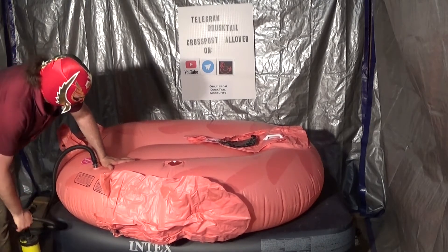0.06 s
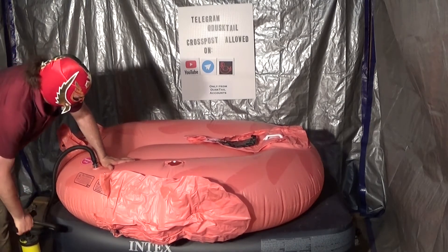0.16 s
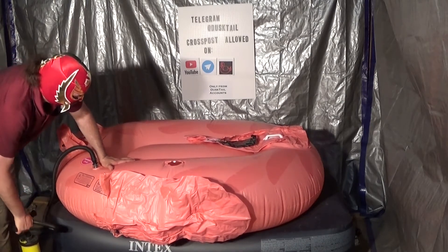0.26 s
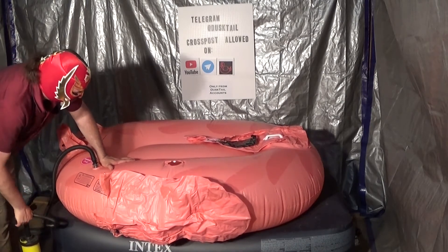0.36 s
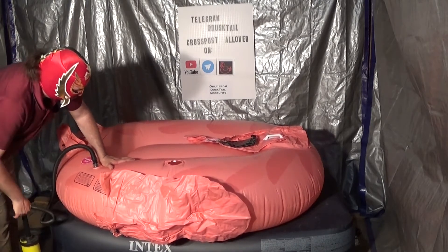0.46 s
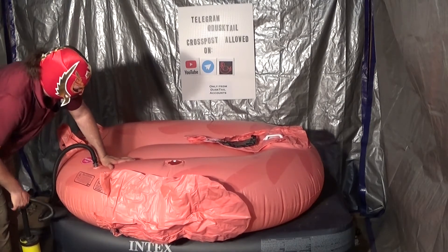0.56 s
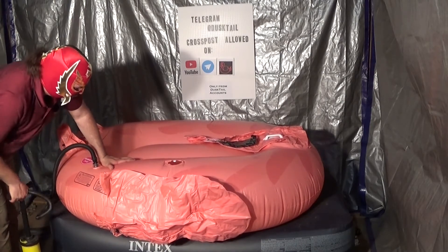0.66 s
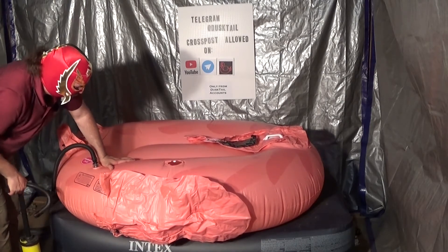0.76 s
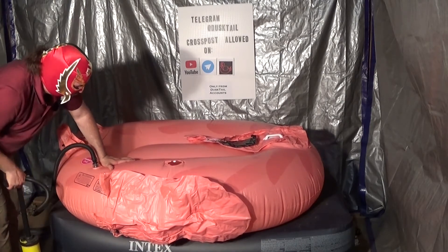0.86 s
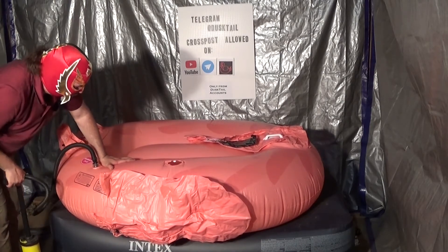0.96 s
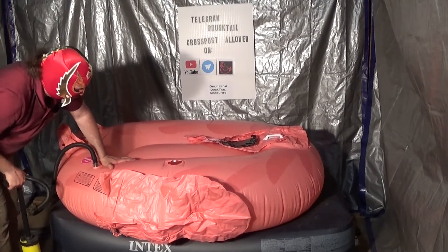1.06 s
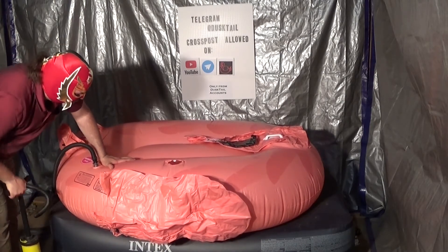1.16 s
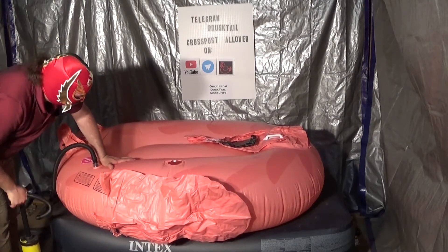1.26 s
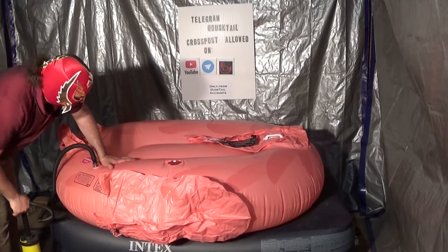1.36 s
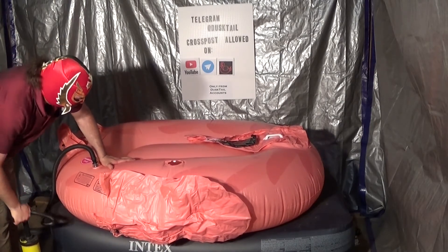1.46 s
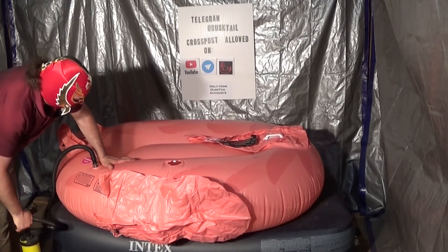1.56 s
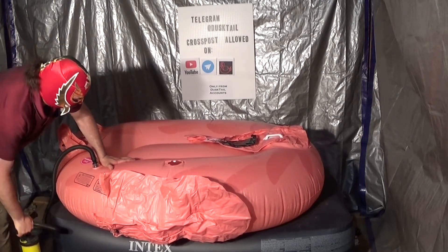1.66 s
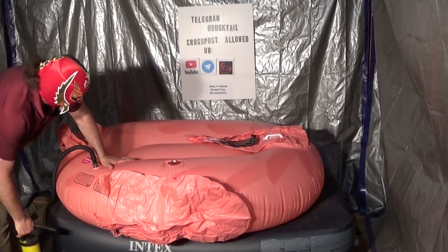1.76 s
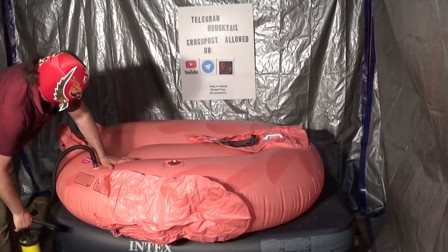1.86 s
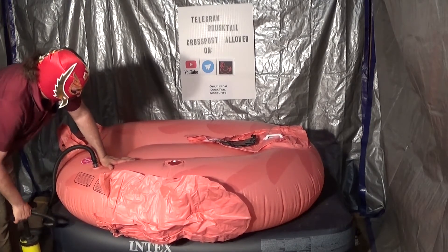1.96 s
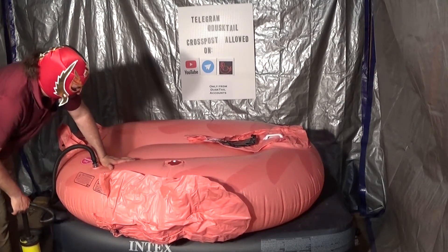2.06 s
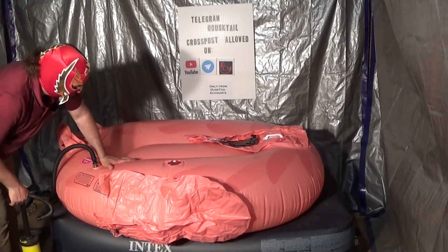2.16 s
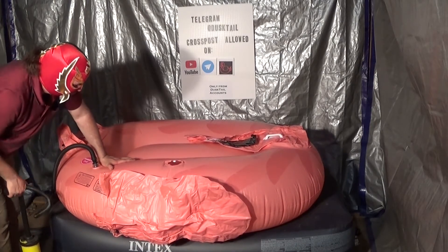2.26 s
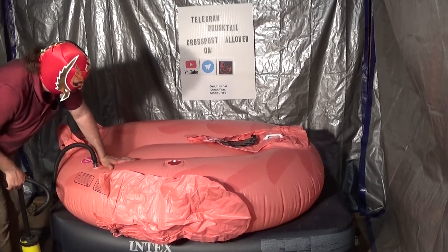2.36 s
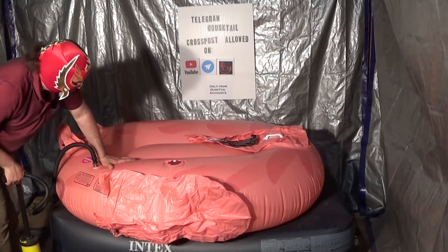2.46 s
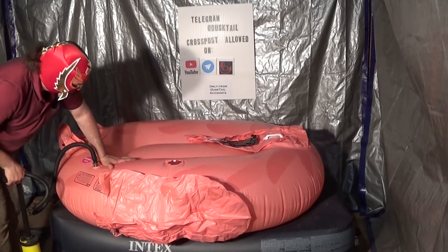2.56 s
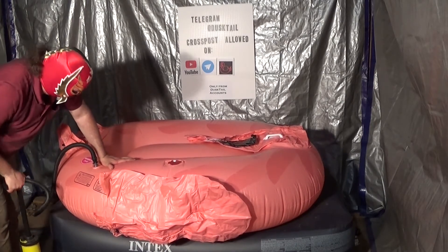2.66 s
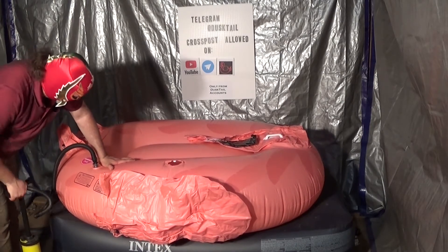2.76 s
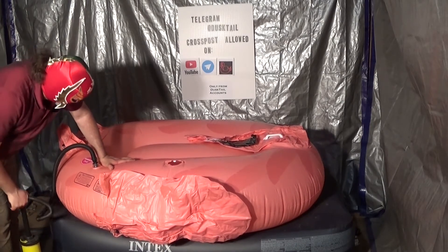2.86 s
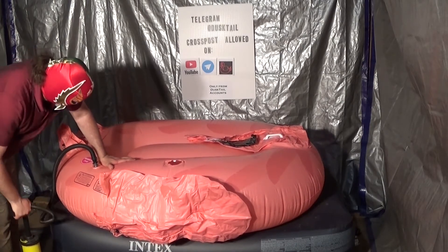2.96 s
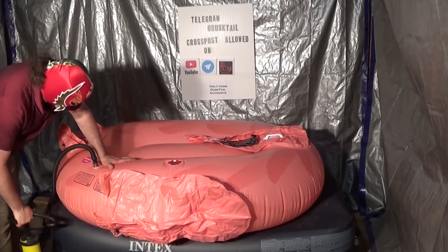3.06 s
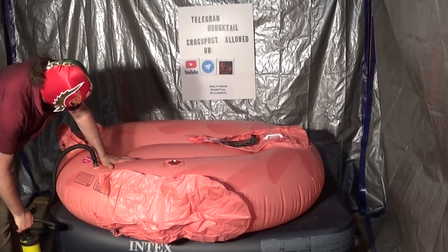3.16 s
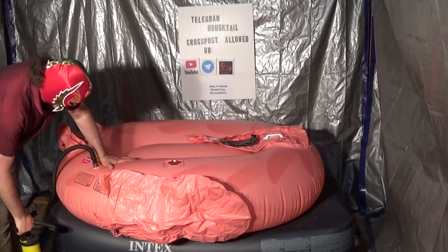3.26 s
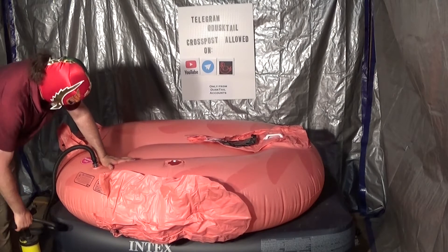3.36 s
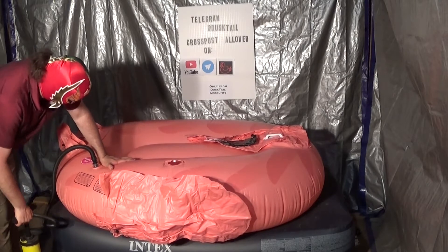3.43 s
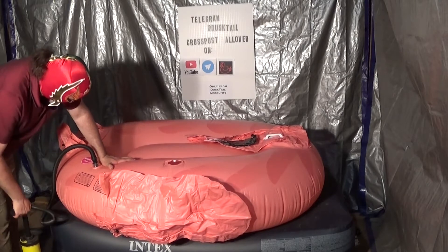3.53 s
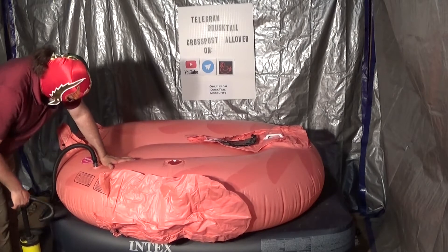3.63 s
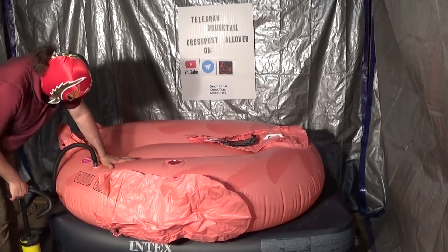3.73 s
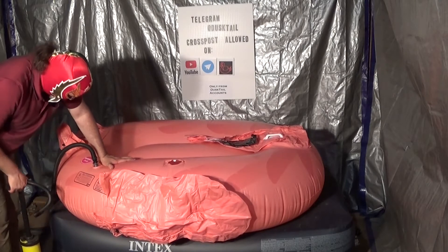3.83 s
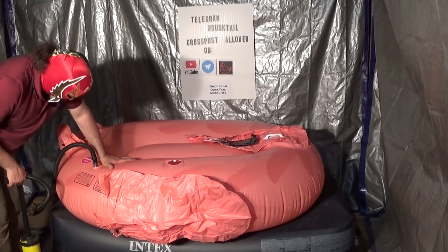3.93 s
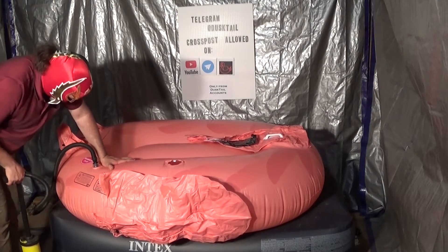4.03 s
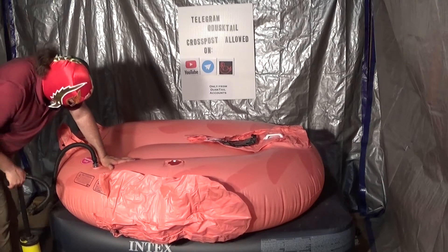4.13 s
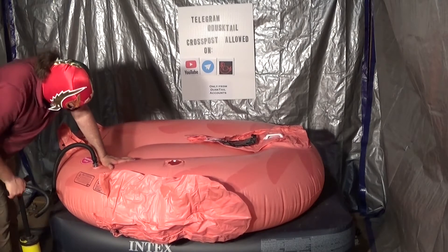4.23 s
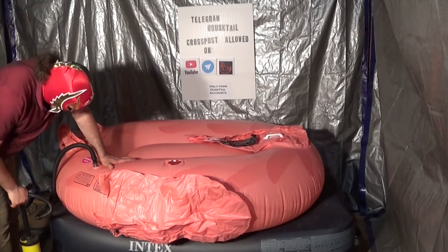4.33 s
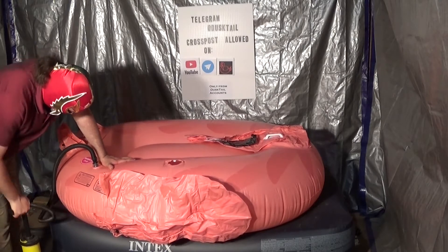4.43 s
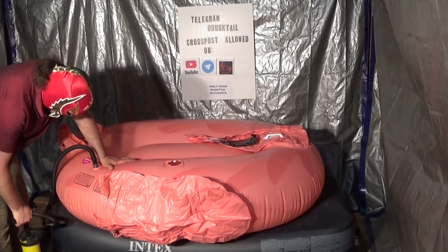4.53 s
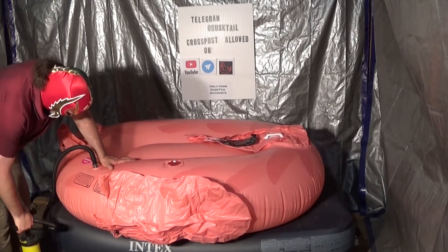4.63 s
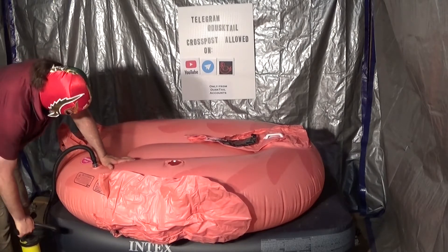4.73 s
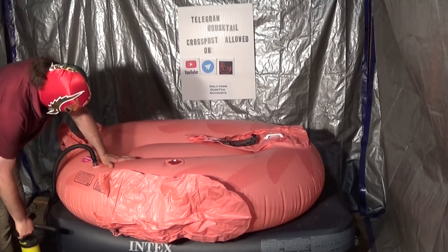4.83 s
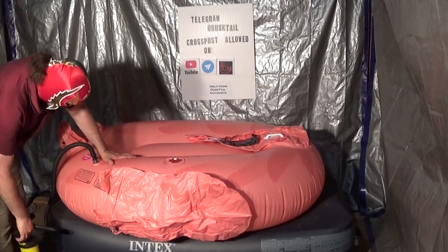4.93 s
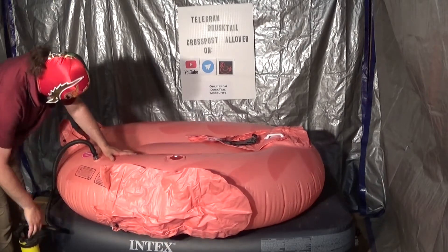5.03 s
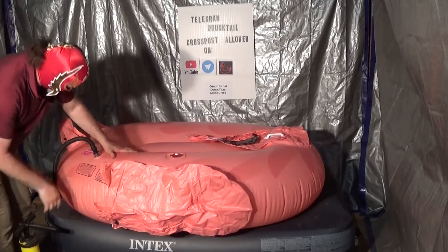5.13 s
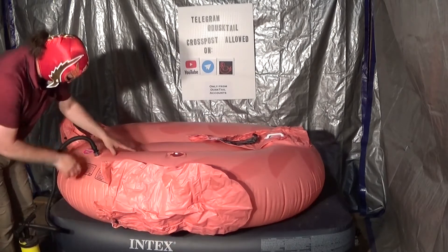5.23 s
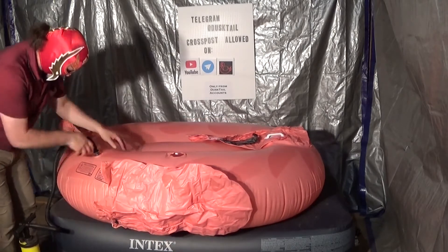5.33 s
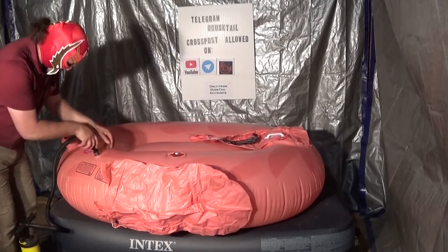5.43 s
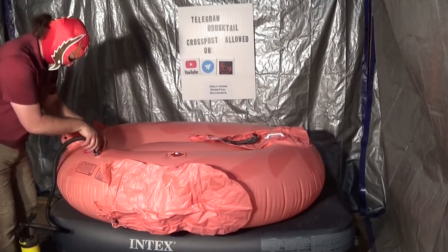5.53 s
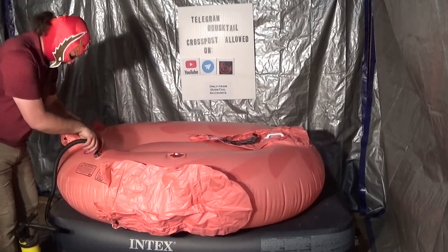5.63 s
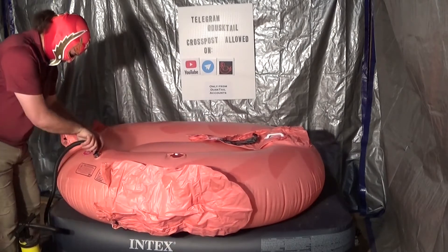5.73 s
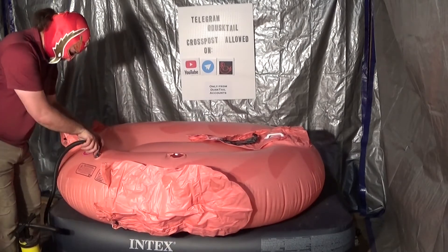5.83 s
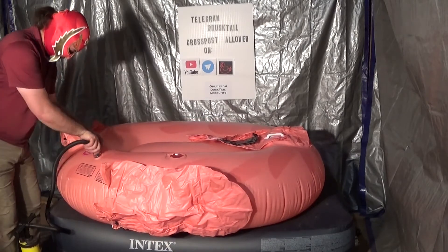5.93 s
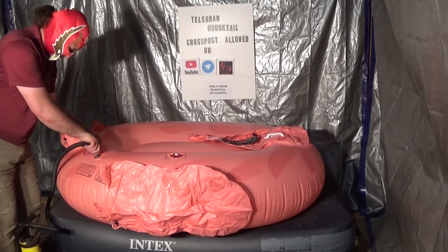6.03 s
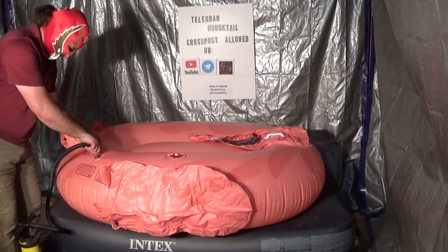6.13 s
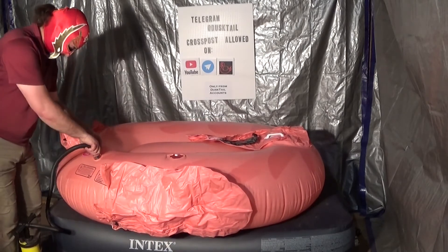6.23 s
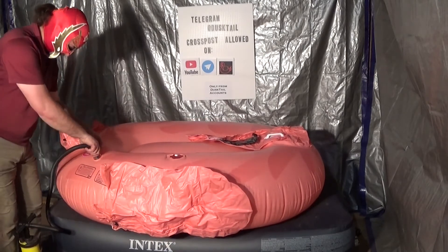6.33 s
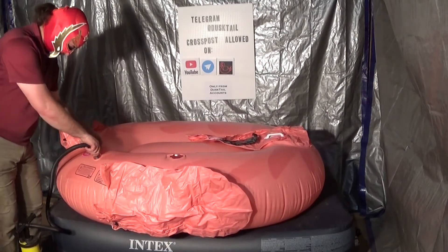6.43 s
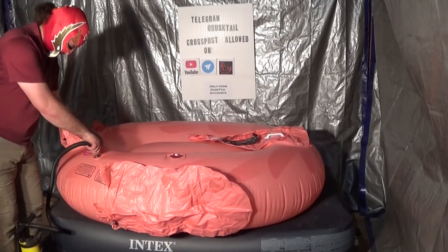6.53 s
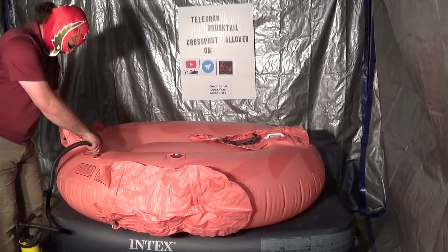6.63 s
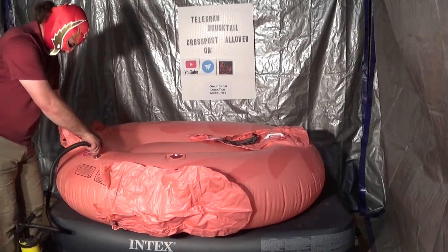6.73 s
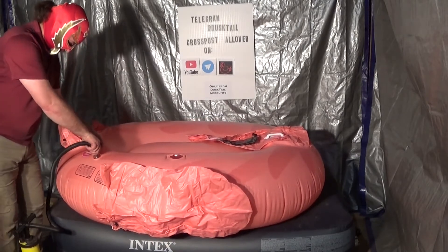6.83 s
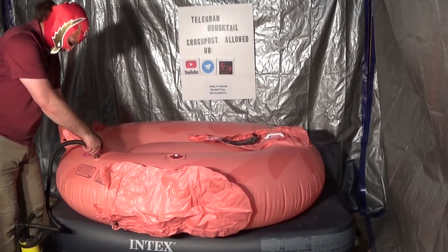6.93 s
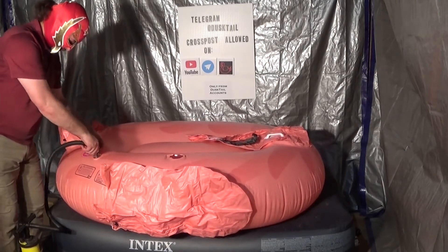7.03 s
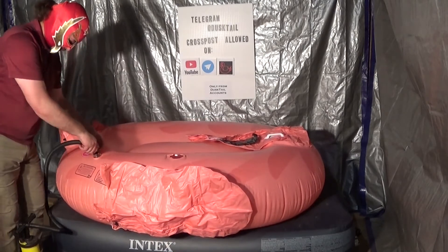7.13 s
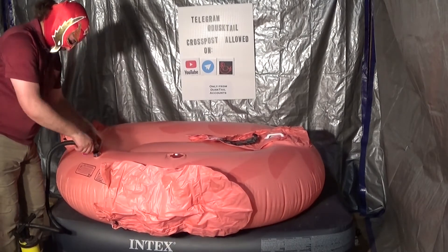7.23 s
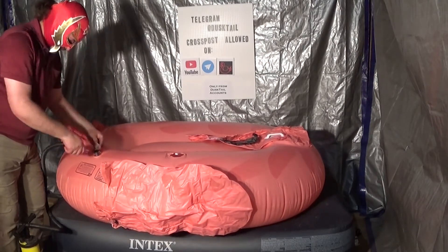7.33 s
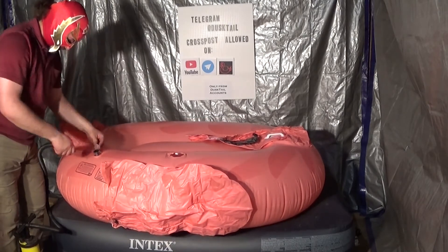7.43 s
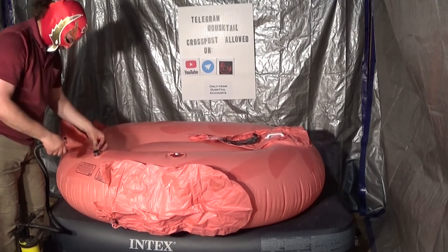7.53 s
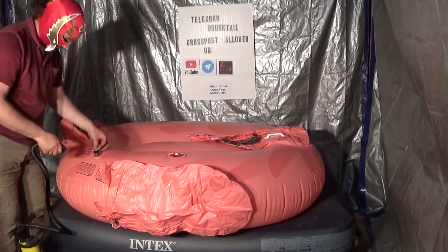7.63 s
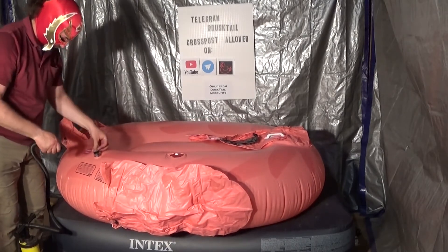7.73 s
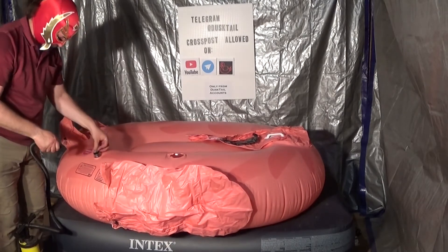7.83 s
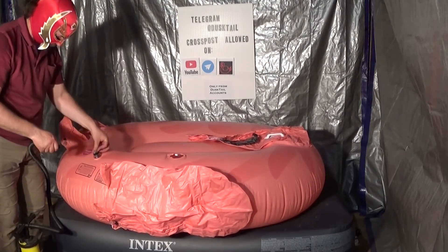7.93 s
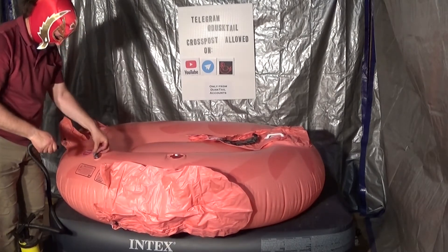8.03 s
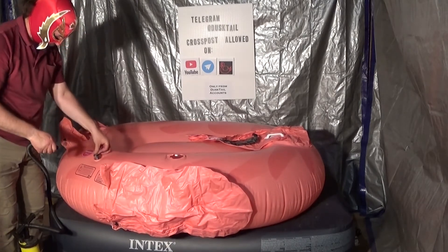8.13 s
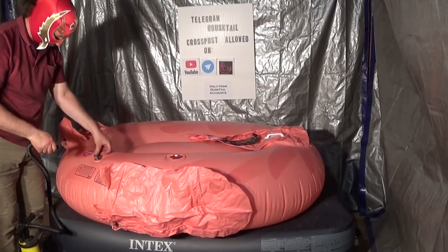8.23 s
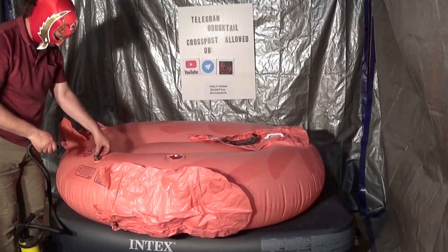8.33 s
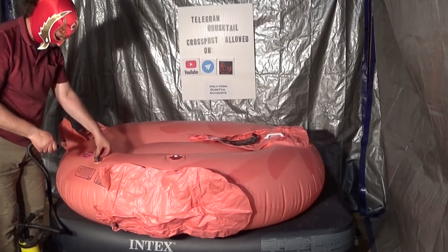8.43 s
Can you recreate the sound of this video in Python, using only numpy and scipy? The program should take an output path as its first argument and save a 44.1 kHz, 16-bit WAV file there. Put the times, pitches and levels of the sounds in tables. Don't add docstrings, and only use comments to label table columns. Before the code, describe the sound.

In a small padded room, a double-action hand pump pushes air through a ribbed hose, each stroke a bright hissing rush with a low thump at the turn. After several strokes it stops, the handle drops softly, and hands knock, rub and click at the vinyl and nozzle. A quiet fan hums. Close stereo pickup, short room reflections.

```python
import sys
import numpy as np
from scipy import signal
from scipy.fft import rfft, irfft
from scipy.io import wavfile
from scipy.ndimage import uniform_filter1d, map_coordinates

SR = 44100
rng = np.random.default_rng(int(sys.argv[2]) if len(sys.argv) > 2 else 0)


def output_pcm(signal):
    pcm = np.clip(np.atleast_2d(signal).T, -1, 1) * 32767
    wavfile.write(sys.argv[1], SR, np.round(pcm).astype(np.int16))


def gain_from_decibels(decibels):
    exponent = np.asarray(decibels, float) / 20
    return 10 ** exponent


N = 373968
CONTROL_STEP = 32

# valve_opens_s, jet_db, hand_slows_s, piston_rests_s, down (1 = push, 0 = pull)
STROKES = [
    (-0.41, -21.8, 0.0, 0.3, 1),
    (0.309, -18, 0.8, 1.03, 0),
    (1.127, -19.2, 1.54, 1.835, 1),
    (1.844, -18.6, 2.39, 2.61, 0),
    (2.678, -19, 3.05, 3.38, 1),
    (3.376, -18.2, 3.88, 4.11, 0),
    (4.183, -18.6, 4.57, 4.87, 1),
]


def unit(x):
    return x / np.sqrt(np.mean(x ** 2) + 1e-20)


def along(points, hz):
    point_hz, value = np.transpose(points)
    return np.interp(np.log(hz + 1), np.log(point_hz + 1), value)


def clock():
    return np.arange(0, N + CONTROL_STEP, CONTROL_STEP) / SR


def smooth(control):
    return np.interp(np.arange(N) / CONTROL_STEP, np.arange(len(control)), control)


def wobble(rate_hz):
    knots = rng.standard_normal(int(N * rate_hz / SR) + 4)
    return smooth(map_coordinates(knots, [clock() * rate_hz]))


def filtered(x, response):
    size = 2 ** 16 * (N // 2 ** 16 + 1)
    return irfft(rfft(x, size) * response(np.fft.rfftfreq(size, 1 / SR)), size)[..., :N]


def modes(table, f):
    total = 0
    for k, (hz, width_hz, db) in enumerate(table):
        total = total + (-1) ** k * gain_from_decibels(db) * 1j * f * width_hz / (hz * hz - f * f + 1j * f * width_hz)
    return total


def rush(colour, patchy_db):
    re, im, field = rng.standard_normal((3, 257, N // 256 + 3))
    field = uniform_filter1d(uniform_filter1d(field, size=5, axis=0), size=8, axis=1)
    patchy = (re + 1j * im) * gain_from_decibels(patchy_db * unit(field))
    noise = signal.istft(patchy, window="cosine", nperseg=512)[1][:N]
    return unit(filtered(noise, colour))


def ring(table):
    t = np.arange(SR // 2) / SR
    tones = 0
    for hz, db, t60_s in table:
        tones = tones + gain_from_decibels(db + rng.normal(0, 1) - 60 * t / t60_s) * np.sin(2 * np.pi * hz * t)
    return tones * (1 - np.exp(-t / 0.0051))


def bursts(rows, blow_db):
    out, t = np.zeros(N + SR), np.arange(SR // 2) / SR
    for start_s, db, t60_s in rows:
        rattle = rng.standard_normal(len(t)) * gain_from_decibels(db - 60 * t / np.clip(t60_s, .02, .5))
        rattle[0] = gain_from_decibels(db + blow_db)
        out[round(start_s * SR):][:len(t)] += rattle
    return out[:N]


def effort(over_db, attack_s, slows):
    slowing_db, slowing_bend, drain_db_per_s = 29, 1.9, 62
    t, power = clock(), 0
    for opens_s, db, slow_s, rest_s, down in STROKES:
        way = int(down > .5)
        slowed = np.clip((t - slow_s) / (rest_s - slow_s), 0, 1) ** slowing_bend
        loss_db = slowing_db * slowed * slows[way] + drain_db_per_s * np.clip(t - rest_s, 0, None)
        build = 1 - np.exp(-np.clip(t - opens_s, 0, None) / attack_s[way])
        power = power + (gain_from_decibels(db + over_db[way] - loss_db) * build) ** 2
    return smooth(power)


def turns(db, rise_s, fall_s):
    t, power = clock(), 0
    for opens_s, _, _, _, down in STROKES[1:]:
        way = int(down > .5)
        decay = np.where(t < opens_s, (t - opens_s) / rise_s[way], (opens_s - t) / fall_s)
        power = power + gain_from_decibels(2 * db[way]) * np.exp(decay * 2)
    return smooth(power)


def jolt(db):
    return turns(db, rise_s=(.025, .025), fall_s=.065)


def background():
    # hz, level_db [dB per Hz]
    room_tone = [(15, -95), (30, -85), (60, -85), (110, -88), (200, -90), (350, -90), (550, -90),
                 (900, -91), (1400, -94.5), (2200, -96.5), (3500, -100.5), (5500, -101.5), (8500, -105),
                 (12000, -110.5), (15700, -112)]
    # pitch_hz, width_hz, level_db
    fan_whines = [(58, 3, -62.5), (290, 20, -72), (511, 6, -67), (560, 7, -66), (689, 9, -72),
                  (821, 3, -63.5), (885, 12, -75), (1480, 9, -72), (1970, 8, -75)]

    def whine_response(f):
        total = 0
        for hz, width_hz, db in fan_whines:
            total = total + gain_from_decibels(db) * np.sqrt(2 * SR / (np.pi * width_hz)) * modes([(hz, width_hz, 0)], f) ** 2
        return total

    air, other = [gain_from_decibels(-55.5) * rush(lambda f: gain_from_decibels(along(room_tone, f)), patchy_db=1.2) for side in "ab"]
    return air + filtered(rng.standard_normal(N), whine_response), 2.0 * other


def camera():
    frame_rate_hz, first_tick_s = 30000 / 1001, .005
    t = np.arange(N) / SR
    since_frames = ((t - first_tick_s) * frame_rate_hz + .5) % 1 - .5
    pulse = np.exp(-(since_frames / frame_rate_hz / .004) ** 2)
    return gain_from_decibels(-60.5) * pulse * np.sin(2 * np.pi * 3820 * t)


def walls(x):
    # hz, t60_s
    decay_times = [(150, 0.52), (1000, 0.35), (5000, 0.28), (12000, 0.05)]
    step, out = 12288, np.zeros((2, N + SR))
    window = np.sin(np.pi * np.arange(2 * step) / (2 * step))
    padded = np.pad(x, (step, 2 * step))
    for at in range(-step, N, step):
        hz, t, z = signal.stft(rng.standard_normal((2, SR // 3)), SR, nperseg=256)
        tail = signal.istft(z * gain_from_decibels(-60 * t / along(decay_times, hz)[:, None]), SR, nperseg=256)[1]
        tail = tail / np.linalg.norm(tail[0])
        piece = padded[at + step:at + 3 * step] * window
        answer = signal.fftconvolve(piece[None], tail, axes=1)[:, max(-at, 0):]
        out[:, max(at, 0):][:, :answer.shape[1]] += answer
    return np.pad(out, ((0, 0), (200, 0)))[:, :N]


def knocks():
    # start_s, peak_db, thud_db, t60_s
    hand_knocks = [(5.121, -29.5, -16, 0.25), (5.189, -32.5, -18, 0.26), (5.242, -33, -14.5, 0.22),
                   (5.331, -22, -23, 0.2), (5.344, -28, -13, 0.18), (5.356, -28.5, -20.5, 0.19),
                   (5.508, -33, -15.5, 0.27), (5.667, -10, -31.5, 0.14), (5.907, -30.5, -8.5, 0.18),
                   (5.968, -32, -10, 0.24), (6.144, -33, -34, 0.18), (6.392, -29.5, -29, 0.22),
                   (6.444, -33.5, -28, 0.26), (6.506, -34, -17, 0.27), (6.633, -33.5, -17, 0.2),
                   (6.809, -33, -26, 0.14), (6.829, -44, -8, 0.22), (6.874, -35, -13, 0.39),
                   (6.961, -31, -10.5, 0.31), (7.126, -38.5, -19, 0.2), (7.541, -30, -31, 0.16),
                   (7.579, -40, -19, 0.29), (8.028, -38, -19, 0.18), (8.128, -22.5, -21, 0.19),
                   (8.331, -34, -15, 0.2), (8.359, -37, -14, 0.2), (8.446, -33, -22, 0.22)]
    # pitch_hz, width_hz, level_db
    skin_modes = [(245, 87, -5.5), (323, 65, -1), (403, 43, 0.5), (467, 40, 0), (563, 49, -1.5),
                  (670, 65, -3), (790, 150, -7.5), (1070, 170, -11.5), (1460, 450, -18.5)]
    skin_blows = bursts([(s, db + 8, t60_s) for s, db, _, t60_s in hand_knocks], blow_db=23)
    thud_blows = bursts([(s, db + thud_db + 22.5, .15) for s, db, thud_db, _ in hand_knocks], blow_db=20)
    skin = filtered(skin_blows, lambda f: modes(skin_modes, f) / (1 + 1j * f / 3000))
    thud = filtered(thud_blows, lambda f: modes([(150, 180, 0)], f) ** 2)
    return skin + thud


def nozzle():
    # start_s, peak_db, snap_db
    clicks = [(5.15, -50, 6), (5.244, -45, -19), (5.3536, -40, -12), (5.6687, -37, 10), (6.1475, -40, -23),
              (6.3933, -33, -20), (6.442, -35.5, -23), (6.5061, -38.5, -15), (6.8763, -37, -25),
              (6.9586, -40, -12), (7.5421, -41.5, -11), (8.1271, -40.5, -0.5)]
    click_blows = bursts([(s, db + 1.5, .06) for s, db, _ in clicks], blow_db=14)
    snap_blows = bursts([(s, db + snap_db + 8, .045) for s, db, snap_db in clicks], blow_db=8)
    click = filtered(click_blows, lambda f: modes([(2770, 4600, 0)], f) ** 2)
    snap = filtered(snap_blows, lambda f: modes([(9300, 3000, 0)], f) ** 2)
    return click + snap


def rubbing():
    # centre_s, half_length_s, level_db
    slides = [(4.8, 0.09, -42), (4.92, 0.15, -46.5), (5.135, 0.07, -46), (5.362, 0.085, -48),
              (5.522, 0.06, -53.5), (5.68, 0.085, -43), (5.905, 0.065, -42), (5.98, 0.03, -53),
              (6.152, 0.04, -54), (6.41, 0.09, -51), (6.635, 0.09, -48), (6.86, 0.07, -48),
              (6.965, 0.055, -51), (7.075, 0.05, -53), (7.56, .07, -56)]
    # hz, level_db [dB per Hz]
    friction = [(150, 1), (400, 3), (800, -2), (1500, -7.5), (6000, -7.5), (10000, -11.5), (13000, -25),
                (15700, -34)]
    t, slide = clock(), 0
    for centre_s, half_s, db in slides:
        slide = slide + gain_from_decibels(db) * np.exp(-((t - centre_s) / np.where(t < centre_s, .4 * half_s, half_s)) ** 2)
    return smooth(slide) * gain_from_decibels(2.5 * wobble(150)) * rush(lambda f: gain_from_decibels(along(friction, f)), patchy_db=2.5)


def piston():
    # pitch_hz, level_db, t60_s
    base_modes = [(131, -3.5, 0.19), (155, 5, 0.13), (190, -3.5, 0.092), (266, -3, .06), (340, -6.5, 0.074)]
    # pitch_hz, level_db, t60_s
    floor_modes = [(35, -0.5, 0.27), (58, 3.5, 0.48)]
    # after_opening_s, peak_db, shove_db
    up_turn = [(-.015, -36, -19)]
    down_turn = [
        (-.048, -44, -13),
        (-.006, -29.5, -17),
        (.025, -32.5, -9.5),
    ]
    # start_s, peak_db, shove_db
    dropped = [(4.98, -35.5, -18.5)]
    thumps = []
    for opens_s, _, _, _, down in STROKES[1:]:
        for after_s, db, shove_db in (down_turn if down > .5 else up_turn):
            thumps.append((opens_s + after_s, db, shove_db))
    out = np.zeros(N + SR)
    for start_s, db, shove_db in thumps + list(dropped):
        thump = gain_from_decibels(db - 1) * ring(base_modes) + gain_from_decibels(db + shove_db - 2.5) * ring(floor_modes)
        out[round(start_s * SR):][:SR // 2] += thump
    return out[:N]


def flap():
    # start_s, length_s, level_db
    squeaks = [(2.645, 0.041, -39)]
    # pitch_hz, level_db
    flap_tones = [(2424, 2), (4628, -7), (6264, -8)]
    t = np.arange(N) / SR
    tone = sum(gain_from_decibels(db + 2.5 * wobble(80)) * np.sin(2 * np.pi * hz * t) for hz, db in flap_tones)
    gate = sum(gain_from_decibels(db) * np.clip(np.minimum(t - s, s + length_s - t) / .003, 0, 1)
               for s, length_s, db in squeaks)
    return tone * gate


def foot():
    # hz, level_db [dB per Hz]
    shudder = [(15, -43), (25, -13), (70, -5), (98, -9.5), (139, 2), (238, -18.5), (260, -8), (340, -40),
               (570, -120)]
    power = effort((-44, -30), attack_s=(.04, .12), slows=(.6, .3)) + jolt((-44, -35))
    return np.sqrt(power) * gain_from_decibels(2.5 * wobble(12)) * rush(lambda f: gain_from_decibels(along(shudder, f)), patchy_db=1.5)


def barrel():
    # hz, level_db [dB per Hz]
    barrel_rush = [(110, -31.5), (180, -8.5), (247, -16), (351, -2), (459, -6), (501, -6.5), (556, -3),
                   (946, -8), (1200, -10.5), (1560, -26), (2640, -120)]
    power = effort((-20.5, -14), attack_s=(.04, .12), slows=(.7, 1.4)) + jolt((-41, -42))
    chamber = lambda f: gain_from_decibels(along(barrel_rush, f)) * (1 + np.abs(modes([(545, 16, -6.5)], f)))
    return np.sqrt(power) * gain_from_decibels(1.2 * wobble(30) + 1.2 * wobble(7)) * rush(chamber, patchy_db=1.5)


def seal():
    # hz, level_db [dB per Hz]
    leak = [(4120, -31.5), (7000, -9), (8910, -9), (9620, -11.5), (13100, -22), (15000, -28.5),
            (15600, -38.5)]
    power = effort((-17.5, -12.5), attack_s=(.09, .035), slows=(.75, .78))
    return np.sqrt(power) * gain_from_decibels(1.5 * wobble(40)) * rush(lambda f: gain_from_decibels(along(leak, f)), patchy_db=-1.5)


def jet_level():
    rebound_db, rebound_at_s, surge_db, surge_at_s, bump_s = 3.2, .066, 1.5, .115, .028
    bump = lambda at_s: smooth(np.exp(-((clock() - at_s) / bump_s) ** 2))
    kick_db = 0
    for opens_s, _, _, _, down in STROKES:
        if down > .5:
            kick_db = kick_db + surge_db * bump(opens_s + surge_at_s) - rebound_db * bump(opens_s + rebound_at_s)
    creep = turns((-36, -33), rise_s=(.012, .022), fall_s=.02)
    push = effort((0, 0), attack_s=(.033, .004), slows=(1, 1))
    return 10 * np.log10(push * gain_from_decibels(2 * kick_db) + creep + 1e-12)


def jet():
    # pitch_hz, width_hz, level_db
    hose = [(1610, 51, -2), (1913, 20, -5), (1997, 33, 0), (2410, 93, -0.5), (2774, 45, 3), (3148, 89, 0),
            (3450, 41, 2), (3803, 43, 3), (4177, 42, 2), (4578, 55, 1.5), (4940, 44, -1), (5280, 61, 0),
            (5594, 49, 0), (5870, 61, -1), (6280, 275, -3.5), (6900, 360, -5.5), (7840, 49, 1),
            (8250, 56, 1), (8730, 91, -1)]
    # hz, level_db [dB per Hz]
    pull_jet = [(530, -43.5), (900, -26.5), (1300, -14.5), (1580, -7), (1850, -7.5), (2610, -4), (2720, -2),
                (3150, -1), (3990, -5.5), (6470, -3.5), (9500, -24.5), (12400, -49.5), (20900, -120)]
    push_jet = [(530, -43), (900, -20), (1000, -36.5), (1120, -13.5), (1310, -11.5), (1580, -4.5),
                (2580, -5.5), (3150, -1), (4400, -5.5), (6470, -3.5), (9500, -18.5), (12400, -46.5),
                (20900, -120)]
    opening_jet = [(590, -46), (1000, -27), (1500, -4.5), (1790, -13.5), (2010, -3), (2160, -11.5),
                   (3160, 1), (3990, -9.5), (6520, -7), (9500, -27), (12400, -53), (20900, -120)]
    slow_jet = [(590, -40), (1000, -15), (1120, -2), (1280, -6.5), (2050, -2), (2610, -2.5), (2900, -2),
                (6160, -3), (9500, -16), (12400, -39), (20900, -120)]
    comb = lambda f: np.sqrt(gain_from_decibels(-10.5) + sum(np.abs(modes([m], f)) ** 2 for m in hose))
    colours = (pull_jet, push_jet, opening_jet, slow_jet)
    eddies = np.array([rush(lambda f: gain_from_decibels(along(colour, f)), patchy_db=1.14) for colour in colours])
    pull, push, opening, slow = map(unit, filtered(eddies, comb))

    level_db = jet_level()
    t, control_t = np.arange(N) / SR, clock()
    pushing = sum((t > opens_s - .04) & (t < rest_s) for opens_s, _, _, rest_s, way in STROKES if way > .5)
    down = uniform_filter1d(pushing * 1., size=800)
    fresh = smooth(sum((control_t > row[0] - .03) * np.exp(-np.abs(control_t - row[0]) / .12)
                       for row in STROKES[1:]))
    dying = (1 - fresh) * np.clip((-21.5 - level_db) / 9, 0, 1)
    full = np.sqrt(np.clip(1 - fresh - dying, 0, 1)) * (down * push + (1 - down) * pull)
    shake_db = 0.67 * wobble(14) + 0.6 * wobble(60)
    return gain_from_decibels(level_db + shake_db) * (full + np.sqrt(fresh) * opening + np.sqrt(np.abs(dying)) * slow)


def scene():
    # hz, correlation
    alike = [(60, 1.0), (180, 1), (550, 0.96), (1650, 0.78), (4970, 0.85), (15000, 0.46)]
    # hz, level_db
    lean = [(60, 0.0), (180, 0.0), (550, 0.5), (1650, 2), (4970, 1.7), (15000, 0.23)]
    hands = knocks() + nozzle() + rubbing()
    near = hands + piston() + flap() + foot() + barrel() + seal() + jet()
    shared, apart = walls(near)
    fan, fan_apart = background()
    echo = gain_from_decibels(-9) * filtered(shared, lambda hz: hz / np.hypot(hz, 400))
    mid = gain_from_decibels(-0.5) * near + echo + fan
    half_angle = lambda hz: np.arccos(np.clip(along(alike, hz), -1, .999)) / 2
    side = filtered(apart + fan_apart, lambda hz: 0.72 * np.tan(half_angle(hz)))
    pair = np.array([mid + side, mid - side])
    return filtered(pair, lambda hz: gain_from_decibels(along(lean, hz) * np.array([[.5], [-.5]]))) + camera()


def low_pass(x):
    return signal.sosfilt(signal.butter(12, 15720, fs=SR, output="sos"), x)


def record(dry):
    mix = filtered(dry, lambda hz: hz < 15720)
    return low_pass(mix)


dry = scene()
out = record(dry)
output_pcm(out)
```